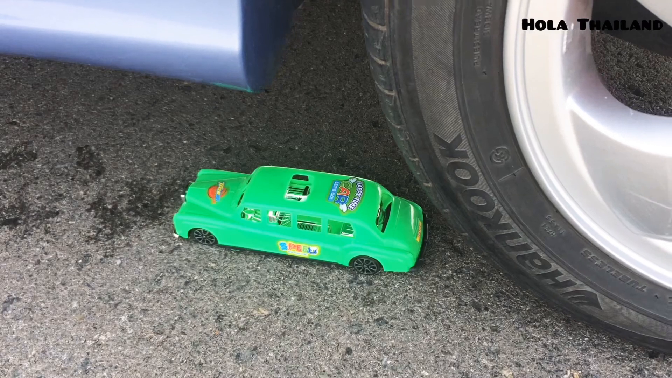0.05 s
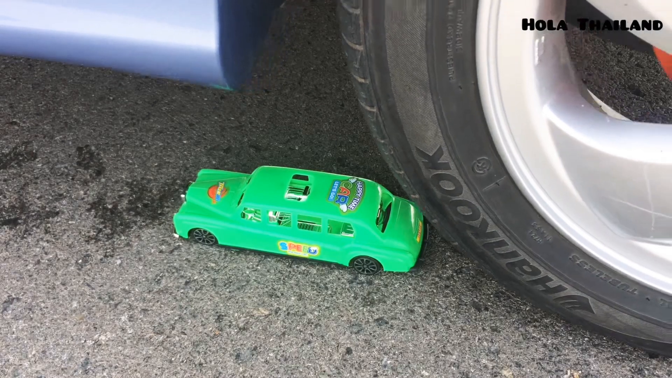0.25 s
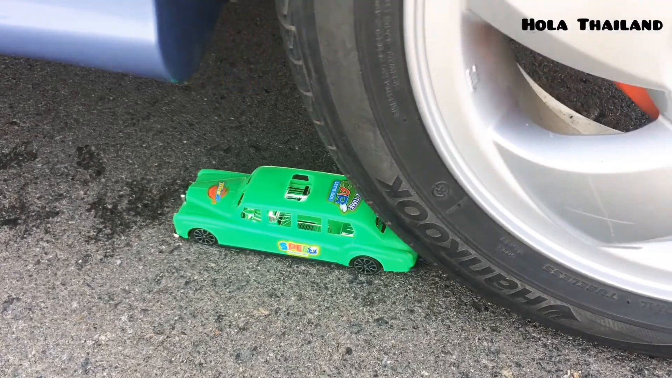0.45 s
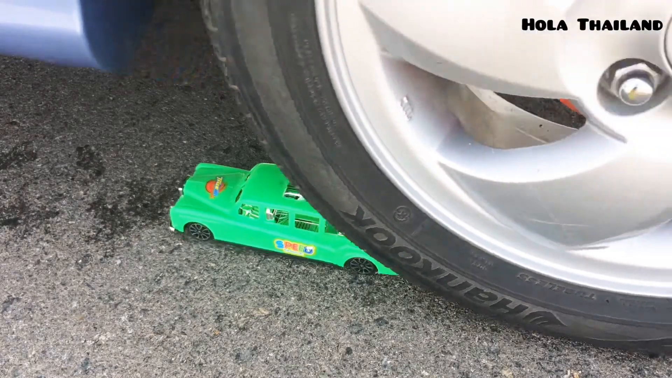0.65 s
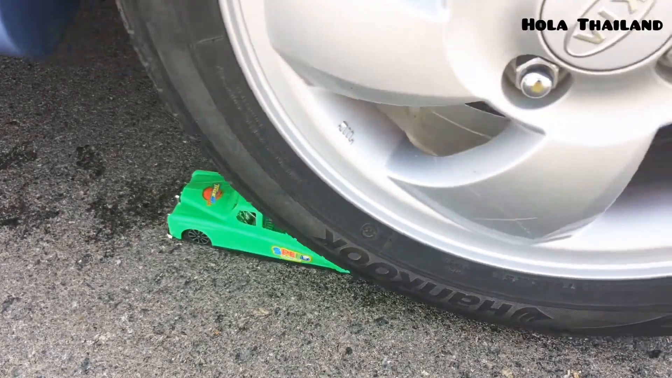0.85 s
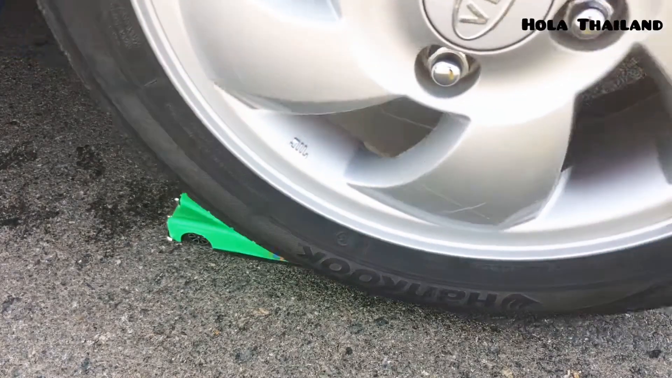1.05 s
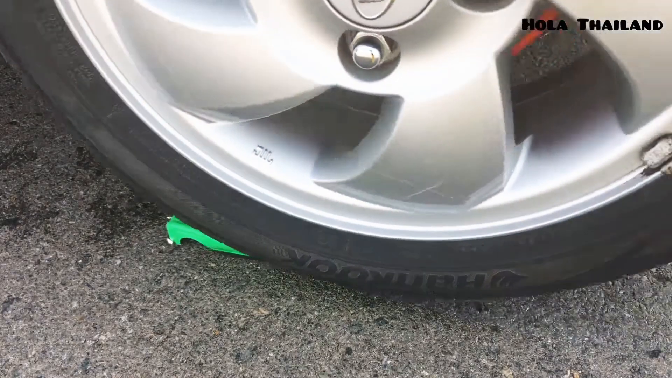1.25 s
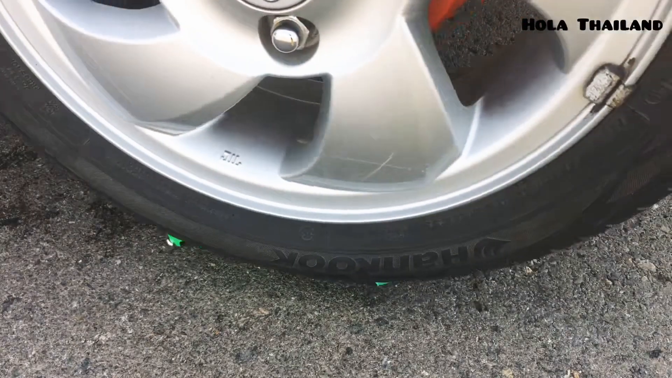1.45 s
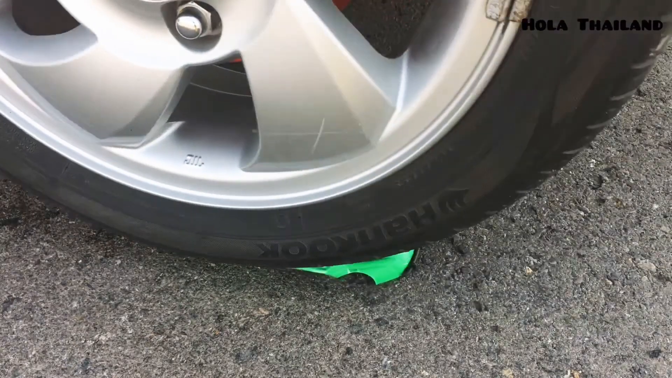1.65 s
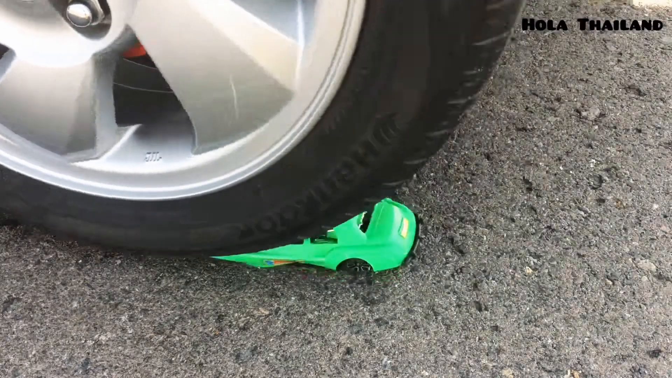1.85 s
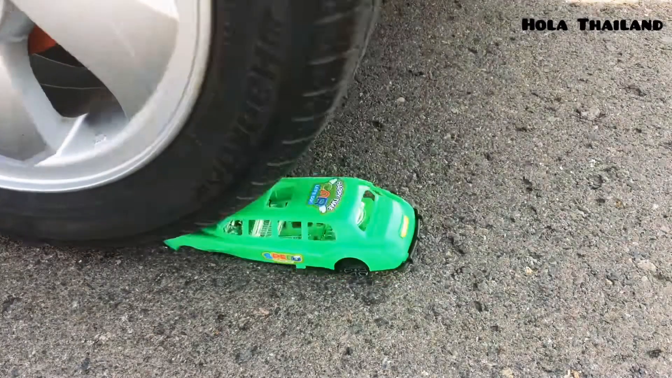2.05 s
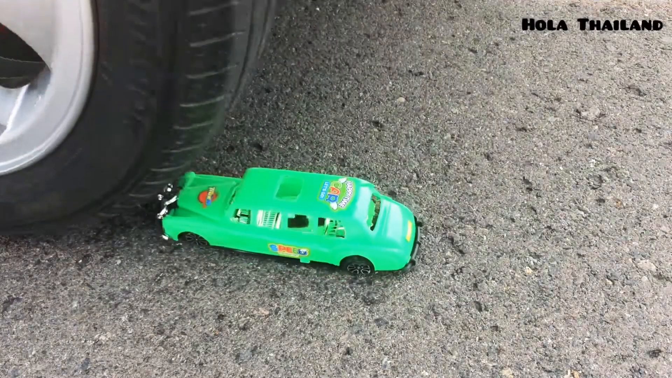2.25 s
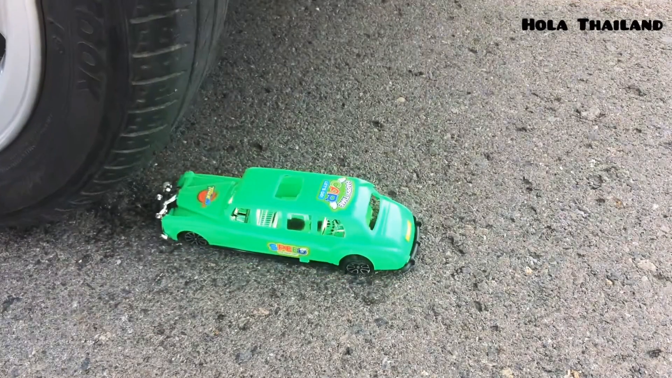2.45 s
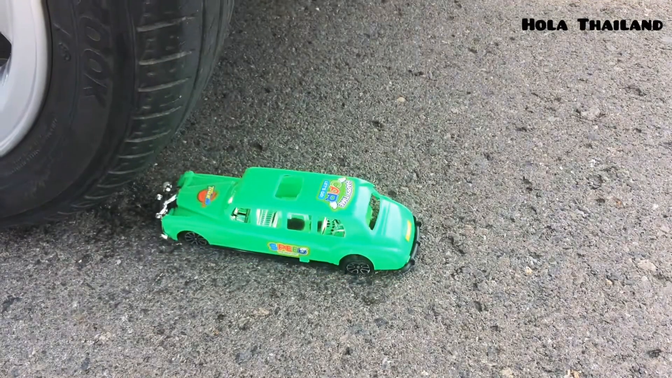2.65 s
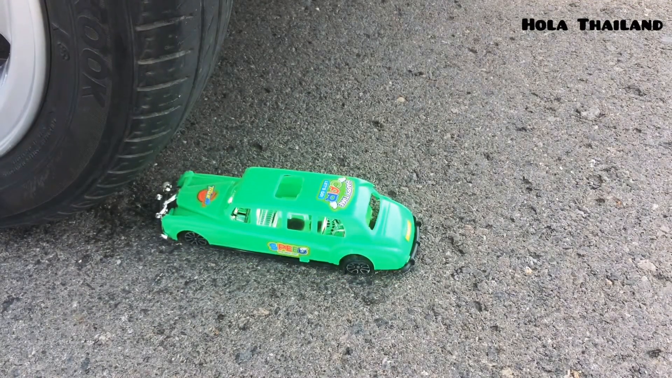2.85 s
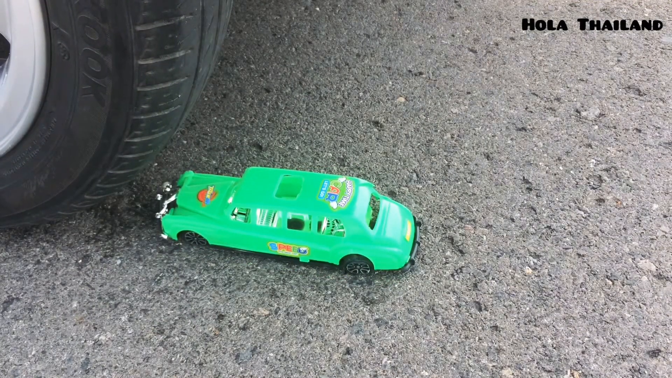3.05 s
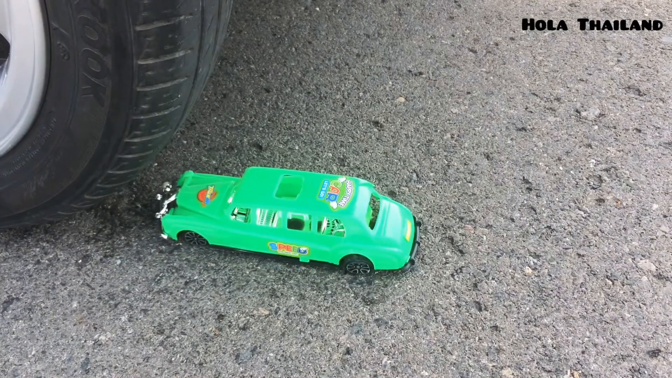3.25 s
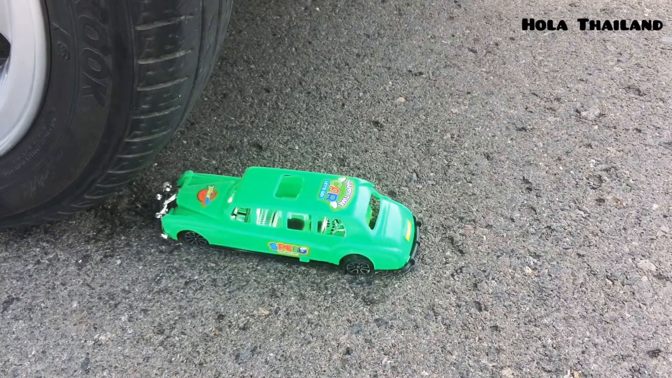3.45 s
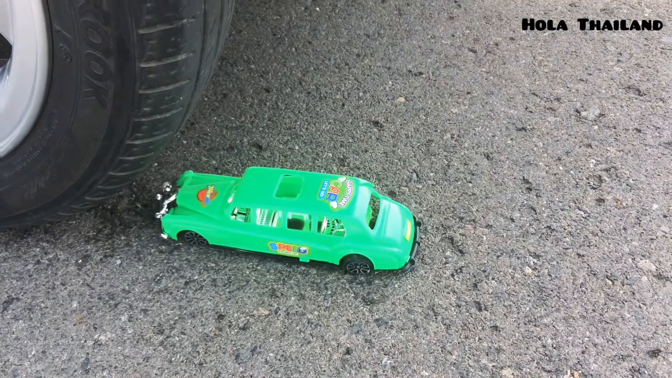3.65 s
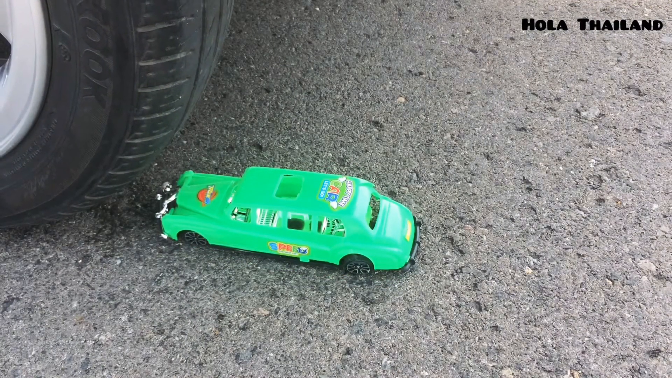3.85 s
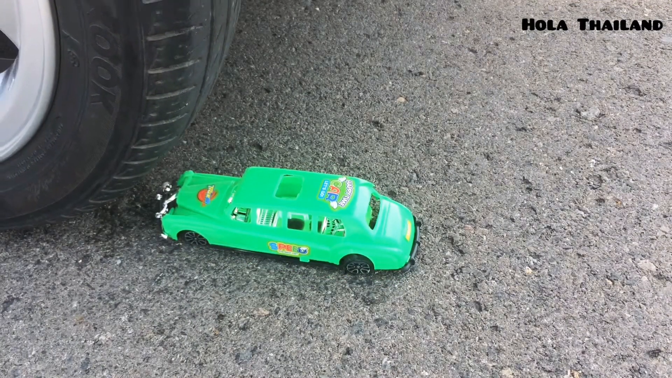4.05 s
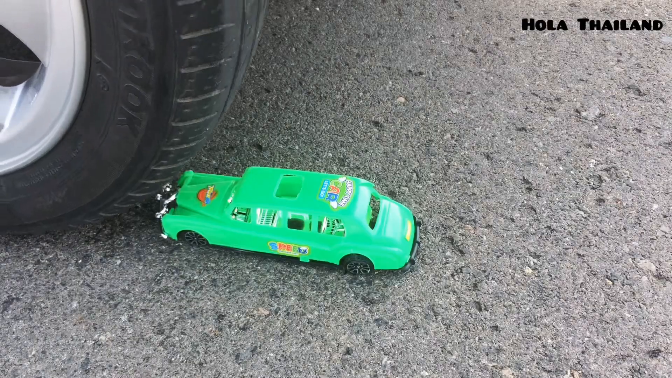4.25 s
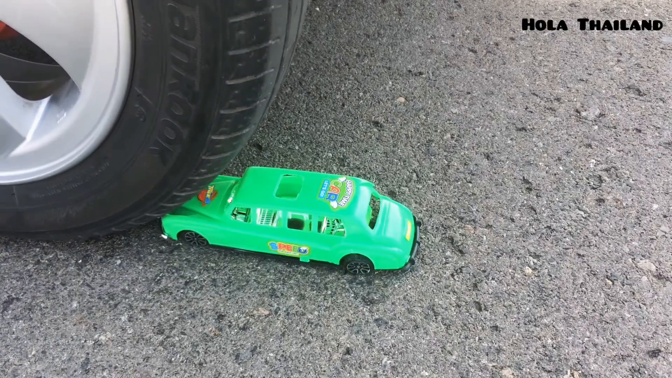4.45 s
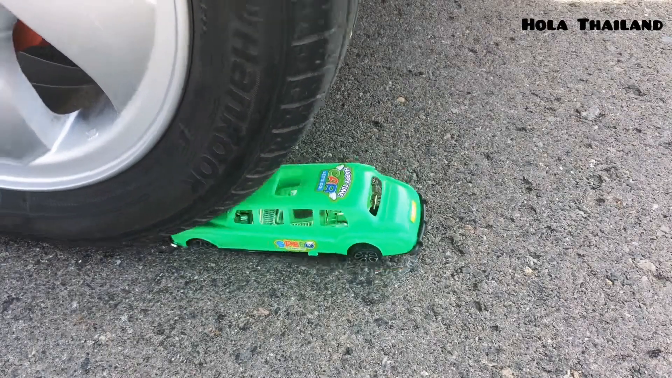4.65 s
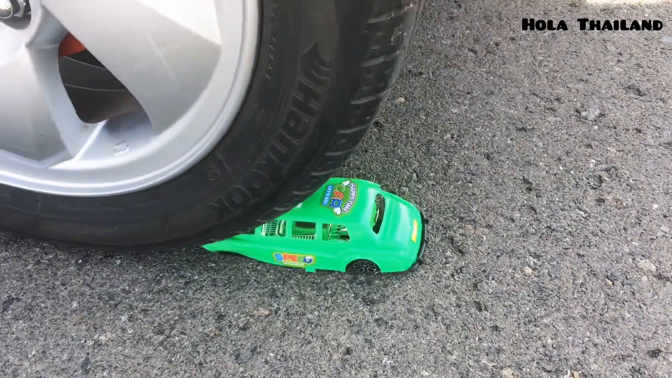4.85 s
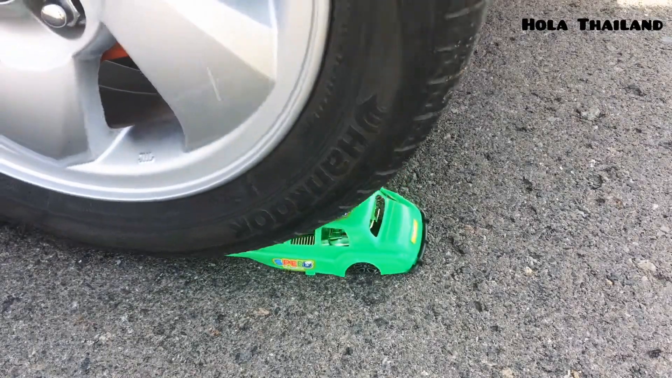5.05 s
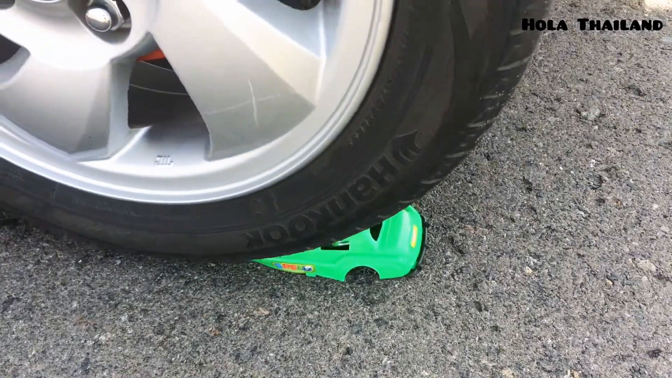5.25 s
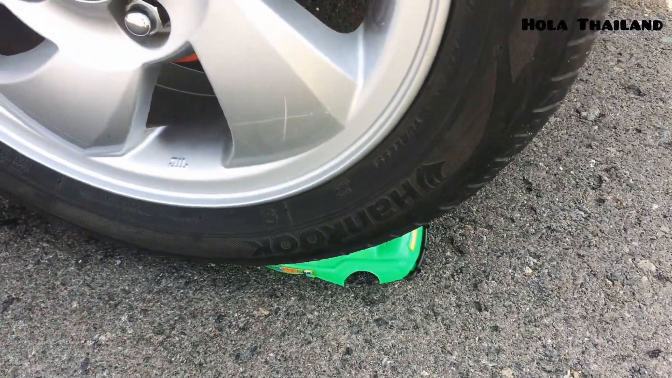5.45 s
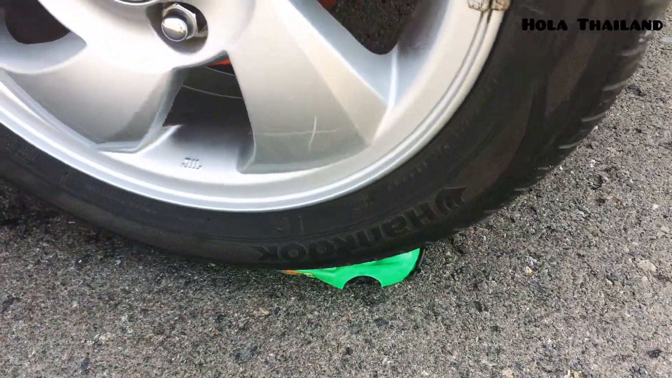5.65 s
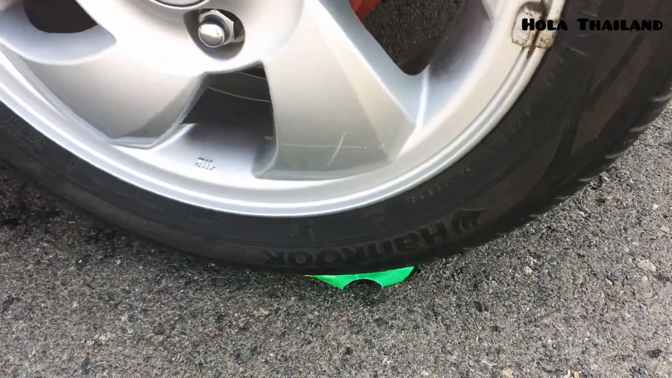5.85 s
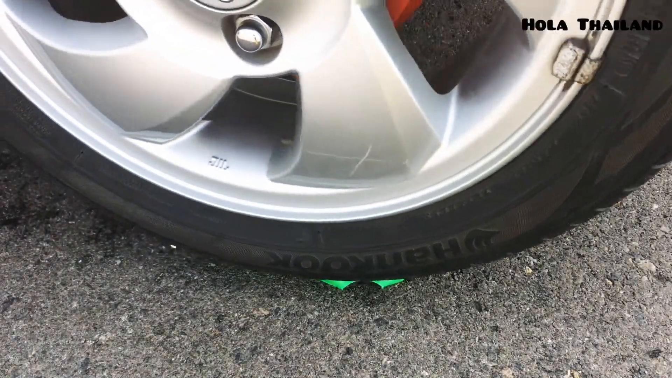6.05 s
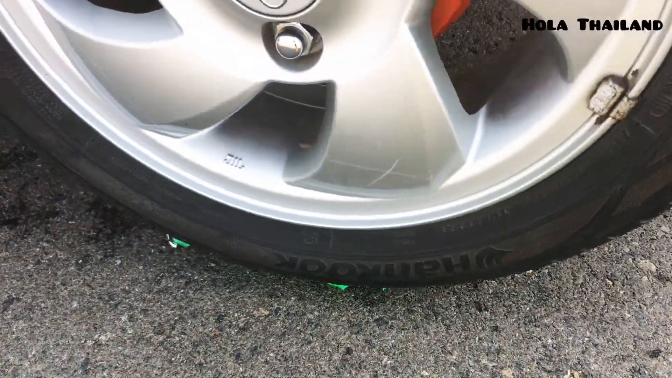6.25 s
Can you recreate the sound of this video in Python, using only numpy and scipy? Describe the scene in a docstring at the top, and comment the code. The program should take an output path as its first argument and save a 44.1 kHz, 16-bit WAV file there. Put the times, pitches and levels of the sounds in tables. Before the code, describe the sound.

Outdoors on asphalt, heard very close and dry. From 0 s a car engine pulls gently with a soft throbbing low roar and faint whine, while the tyre hisses and ticks over grit. Around 0.8-0.95 s rubber squeaks sharply upward on hollow plastic, breaking into rasps. Immediately bright, brittle cracks erupt, densest and loudest from 0.92 to 1.8 s, with short panel rings, rattling clatter and dull low thuds, thinning by 2.3 s. Wind-like low buffeting swells in lumps, strongest near 2.4-2.7 s, then stops dead at 2.75 s. Quiet idling remains, with soft scuffs at 3.2-3.6 s and a light engine push near 3.9 s. From 4.6 s the wheel creeps back: sparse, duller cracks, a strong one at 4.96 s, a thin creak at 5.23 s, a hollow thudding crunch at 5.85 s and a final heavy crack near 6.29 s.

```python
"""On asphalt, close to a phone: a car tyre rolls slowly over a hollow plastic toy car, stops and rolls back over it.
Rubber squeaks by stick-slip tones; panels crack as shaped noise bursts that ring and rattle; low modes thud.
The engine idles as throbbing filtered noise with a faint whine, and the tread hisses and ticks over grit.
Low filtered noise, like wind on the microphone, swells and stops dead; later come soft scuffs and thin creaks."""
import sys
import numpy as np
from scipy import signal
from scipy.fft import rfft, irfft
from scipy.io import wavfile
from scipy.ndimage import uniform_filter1d

SR = 44100
rng = np.random.default_rng(int(sys.argv[2]) if len(sys.argv) > 2 else 0)


def store_pcm(level_fs):
    """Save levels as 16-bit WAV."""
    pcm = np.round(np.clip(level_fs, -1, 1) * 32767).astype(np.int16)
    wavfile.write(sys.argv[1], SR, np.atleast_2d(pcm).T)


N = 277830
TIME = np.arange(N) / SR
CLATTER_T60_S = 0.063  # the hollow shell's decay by 60 dB, shared by the cracks and the squeak


def undb(db):
    """Decibels to gain."""
    return 10 ** (np.asarray(db) / 20)


def unit(x):
    """Scale to rms 1."""
    return x / np.sqrt(np.mean(x ** 2))


def decay(t, t60_s):
    """Exponential decay that falls by 60 dB in t60_s."""
    return np.exp(-np.log(1000) * t / t60_s)


def curves(table):
    """The columns of a table, joined by straight lines in time."""
    s, *columns = np.transpose(table)
    return [np.interp(TIME, s, column) for column in columns]


def slope(f, points):
    """Gain at frequencies f of a spectrum of (Hz, dB) points, joined on a logarithmic pitch axis."""
    hz, db = np.transpose(points)
    return undb(np.interp(np.log(f), np.log(hz), db))


def resonance(f, hz, width):
    """Response of one resonance, 1 at its centre."""
    return 1 / (1 + 1j * (f * f - hz * hz) / (f * width))


def bins(size):
    """Frequencies of a transform, kept just above zero."""
    return np.maximum(np.arange(size // 2 + 1) * SR / size, 1)


def colour(x, points):
    """Filter by a spectrum; rms 1."""
    return unit(irfft(rfft(x) * slope(bins(len(x)), points), len(x)))


def ring(x, hz, width):
    """Filter by one resonance; rms 1."""
    return unit(irfft(rfft(x) * resonance(bins(len(x)), hz, width), len(x)))


def causal(gain):
    """The response with this gain that starts at once and then dies away (minimum phase)."""
    cepstrum = irfft(np.log(gain))
    half = len(cepstrum) // 2
    return np.exp(rfft(np.r_[cepstrum[0], 2 * cepstrum[1:half], np.zeros(half)]))


def noise():
    """White noise."""
    return rng.standard_normal(N)


def walk(rate):
    """Slow chance: random levels held 1 / rate s and slewed; spread 1."""
    hold = int(SR / rate)
    levels = rng.standard_normal(N // hold + 1)
    return unit(uniform_filter1d(np.repeat(levels, hold)[:N], hold))


def grains(rate, spread_db):
    """Random clicks, most of them small, none far above the rest."""
    size_db = spread_db * np.minimum(rng.exponential(size=N), 3)
    return (rng.random(N) < rate / SR) * undb(size_db) * np.sign(noise())


def spell(start, end, attack_s, release_s):
    """Envelope that rises to 1 at start, holds until end and dies away."""
    before, after = np.minimum(TIME - start, 0), np.maximum(TIME - end, 0)
    return np.exp(-(before / attack_s) ** 2 - (after / release_s) ** 2)


def add(out, s, sound):
    """Mix a sound in at time s."""
    i = int(s * SR)
    out[..., i:i + sound.shape[-1]] += sound[..., :N - i]


def slip(hz, rough, partials_db, jitter=0.016, smear=0.58):
    """One rubbing contact: a wavering tone; uneven slips spread every partial into a narrow band."""
    phase = 2 * np.pi * np.cumsum(hz * (1 + jitter * (0.66 + 2 * rough) * walk(500))) / SR
    tone = 0
    for k, db in enumerate(partials_db, start=1):
        clean = (1 - rough) * np.sin(k * phase)
        smeared = smear * rough * walk(600) * np.cos(k * phase)
        tone = tone + undb(db) * (clean + smeared)
    return tone


def engine(whine_hz=1274.5, whine_width_hz=79.0, whine_db=-13.0, firing_hz=25.33, throb=0.19,
           bass_db=-10.0, roar_share=0.13, idle_db=-46):
    """Idle: a soft roar that throbs with the firings, a bass that grows with effort, and a narrow belt whine."""
    # spectrum of the roar: pitch_hz, level_db
    idle_colour = [(15, -41), (25, -10.5), (68, -7), (195, -11.5), (236, -9), (335, -17.5), (451, -10),
                   (516, -20), (560, -15), (607, -17.5), (988, -20), (1290, -20), (1790, -31),
                   (2220, -29.5), (16000, -54.5)]
    # the engine pulls to move the car: start_s, end_s, effort_db (in full on the bass, a share on everything)
    effort = [(0, .85, 15.5), (3.8, 4.021, 8)]
    effort_db = sum(db * spell(start, end, 0.17, 0.096) for start, end, db in effort)
    firing_rate = firing_hz * (1 + 0.025 * walk(2.6))
    firing = 1 + throb * np.sin(2 * np.pi * np.cumsum(firing_rate) / SR)
    roar = colour(noise(), idle_colour) * undb(1.1 * walk(5.6) - 4.0)
    bass = ring(ring(noise(), 76.0, 56.0), 62., 60.) * undb(bass_db + effort_db)
    whine = ring(ring(noise(), whine_hz, whine_width_hz), whine_hz, whine_width_hz)
    whine *= undb(whine_db + 2.1 * walk(10))
    return undb(idle_db + roar_share * effort_db) * (firing * (roar + whine) + bass)


def rumble(bed_db=-47.5, low_db=2.0, gust_db=-17.0, gust_growth=0.41, lump_db=5.5, end_s=2.752):
    """Low buffeting that comes in lumps, reaches higher as it grows, then stops dead."""
    # swells on top of the steady bed: start_s, end_s, level_db
    swells = [(0, 0.503, -45), (0.545, 0.968, -39), (1.17, 1.427, -34), (1.765, 1.944, -35.5),
              (2.114, 2.303, -31.5), (2.351, 2.42, -23.5), (2.477, 2.624, -27), (2.667, 2.75, -23)]
    # spectrum of the low flow: pitch_hz, level_db
    low_colour = [(25, -25), (45, -10.5), (65, 2), (110, 5.5), (175, 5.5), (230, -2.5), (300, -11.5),
                  (450, -50.5), (4000, -100)]
    # spectrum of the higher gusts: pitch_hz, level_db
    gust_colour = [(180, -20.5), (270, 0), (420, -5.5), (560, -13.5), (750, -33), (1100, -52), (4000, -100)]
    swell_power = sum((undb(db) * spell(start, end, 0.018, 0.038)) ** 2 for start, end, db in swells)
    strength = np.sqrt(undb(bed_db) ** 2 + swell_power)
    growth = (strength / undb(bed_db)) ** gust_growth
    upper = growth * undb(gust_db + lump_db * np.tanh(walk(45)))
    low, gust = colour(noise(), low_colour), colour(noise(), gust_colour)
    low /= np.sqrt(uniform_filter1d(low ** 2, size=4000))  # the flow is steady over a few eddies
    stop = np.clip((end_s - TIME) / 0.018 + 0.32, 0, 1)
    return stop * strength * (undb(low_db) * low + upper * gust)


def tread(flutter_db=1.5):
    """A fine hiss of rubber on asphalt while the wheel turns, with single grains ticking in it."""
    # the wheel rolls forward, slows to a halt, then creeps back: start_s, end_s, level_db
    rolls = [(0, 2.35, -53.5), (2.48, 2.74, -58), (4.6, 7.5, -68)]
    # the tread drags briefly over grit: centre_s, level_db, length_s (rise and fall each)
    drags = [(0.972, -53, 0.47), (2.351, -47.5, 0.051), (5.557, -54, .035), (6.188, -59, 0.11)]
    # spectrum of the hiss: pitch_hz, level_db
    grit_colour = [(300, -14.5), (900, 2.5), (2000, 1), (5000, 0), (8000, -10.5), (15000, -16)]
    rolling = sum(undb(db) * spell(start, end, .12, 0.021) for start, end, db in rolls)
    dragging = sum(undb(db) * spell(s, s, length, length) for s, db, length in drags)
    tick = rng.standard_normal(400) * np.exp(-np.arange(400) / 80)
    ticks = .6 * unit(signal.fftconvolve(grains(120, 2.5), tick)[:N])
    level = np.hypot(rolling, dragging) * undb(flutter_db * walk(8.7))
    return level * colour(noise() + ticks, grit_colour)


def small_cracks(count=24, spread_db=1.0, panel_hz=1900., spread_octaves=.6):
    """Rows like those of the fractures for the ticks of the strained shell, spread loosely over each pass."""
    # the shell ticks at random while the wheel is on it: start_s, end_s, level_db (before the spread)
    strain = [(.64, 2.3, -12.5), (4.565, 6.274, -18.5)]
    rows = []
    for start, end, db in strain:
        for k in range(count):
            when, cave = rng.random(2)
            loud, high = np.clip(rng.standard_normal(2), -2, 2)
            s = start + (end - start) * (k + when) / count
            rows.append((s, db + spread_db * loud, panel_hz * 2 ** (spread_octaves * high), cave))
    return rows


def splinter(f, count=14):
    """Every break leaves a piece of another shape, with a few sharp modes of its own; mean power 1."""
    pitches = 500 * 26 ** rng.random(count)  # 500 to 13000 Hz
    gain = np.abs(1 + sum(1.3 * resonance(f, hz, 80 + hz / 35) for hz in pitches))
    return gain / np.sqrt(np.mean(gain[(f > 500) & (f < 13000)] ** 2))


def cracks(tear_s=0.00059, panel_q=4., panel_db=11.0, panel_clatter_db=7.0, shell_db=-10.5,
           treble_t60_s=0.061, strain_dull_db=-11.5, size=8192):
    """Each fracture tears for about a millisecond, rings its panel and clatters on in shell and under wheel."""
    # fractures: start_s, level_db, panel_hz, cave_in (0 a clean snap, 1 the panel collapses)
    fractures = [(0.8167, 4.5, 1520, 0.4), (0.887, 5.5, 2790, 0.48), (0.9197, 10, 2060, 0.63),
                 (0.9223, 16, 4060, 0.27), (1.012, 11.5, 1930, 0.61), (1.0605, 13.5, 3100, 0.63),
                 (1.0911, 10, 5200, 0.62), (1.1058, 10, 5040, 0.29), (1.185, 1.5, 5250, 0.48),
                 (1.1976, 12.5, 710, 0.52), (1.2806, 7, 1590, 0.11), (1.341, -2.5, 1476, 0.36),
                 (1.3958, 3.5, 5100, .35), (1.4099, 14.5, 2530, 0.55), (1.4199, 14, 1190, 0.55),
                 (1.5097, 6.5, 2360, 0.89), (1.5278, 10.5, 2730, 0.54), (1.551, 4.5, 2780, 0.27),
                 (1.5635, 12.5, 5800, 0.44), (1.5896, 4, 3630, .3), (1.6026, 7.5, 2320, 0.054),
                 (1.6469, 13, 464, 0.3), (1.6834, 7, 1260, 0.82), (1.6979, 7, 2330, 0.76),
                 (1.7025, 5, 3700, 0.83), (1.7262, 4.5, 483, 0.47), (1.7358, 16.5, 634, 0.38),
                 (1.755, 10, 3460, 0.1), (1.7886, 10.5, 1010, 0.98), (1.8131, 13, 685, 0.23),
                 (1.903, 6.5, 2780, 0.2), (1.9653, -2.5, 1590, 0.2), (2.0122, -9, 2770, 0.21),
                 (2.0335, -3.5, 740, 0.14), (2.0614, 5, 810, 0.42), (2.1142, 3, 1250, 0.082),
                 (2.1487, -5.5, 1290, 0.38), (2.192, -8.5, 1650, 0.35), (2.207, 8.5, 2190, 0.22),
                 (2.2272, -1, 1540, 0.15), (2.2986, -13.5, 5700, 1), (2.3062, -12, 8350, .8),
                 (4.629, 0, 2200, 0.15), (4.6415, -7.5, 1440, 0.67), (4.67, -4, 4200, 0.33),
                 (4.881, -1.5, 1110, 0.25), (4.964, 16.5, 1470, 0.26), (5.007, -12, 1310, 0.26),
                 (5.2178, 2.5, 1650, 0.65), (5.2302, 6, 3500, 0.3), (5.3003, -20.5, 820, .8),
                 (5.4712, -0.5, 1070, 0.6), (5.5166, -2.5, 5500, .4), (5.5875, -2, 1330, 0.47),
                 (5.593, -3.5, 1350, 0.47), (5.779, -12, 1060, .25), (5.846, 10.5, 1640, 0.85),
                 (6.029, -5, 2120, 0.68), (6.159, -7, 1120, 0.57), (6.286, 15.5, 1120, 0.53)]
    # resonances of the toy's shell: pitch_hz, width_hz, level_db (before shell_db)
    shell_modes = [(507, 52, -8.5), (1151, 22, -2.5), (1430, 420, 1.5), (2270, 43, -6), (2750, 75, -10),
                   (2700, 68, 0.5), (3456, 120, -3.5), (4800, 300, -3), (5930, 760, 8.5)]
    # treble of the cracks, the whole shell bright and the broken one dull: time_s, gain_db at 8 kHz
    snap_points = [(.9, -11), (1.15, -8.5), (1.5, -13.5), (2.3, -9.0), (4.7, -23), (4.96, -22),
                   (5.25, -30.5), (5.85, -20.5), (6.3, -22)]
    out, t, f = np.zeros((2, N)), np.arange(size) / SR, bins(size)
    modes = sum(undb(db) * resonance(f, hz, width) for hz, width, db in shell_modes)
    shell = np.abs(1 + undb(shell_db) * modes)
    shell /= np.sqrt(np.mean(shell[(f > 500) & (f < 7000)] ** 2))
    treble = 1 / (1 + (4000 / f) ** 4)  # share of the power
    fade = np.clip(3 - 4 * t / t[-1], 0, 1)
    build = 1 - np.exp(-t / 0.00043)

    def burst(envelope):
        """Spectrum of a dense run of tiny impacts, energy 1."""
        return rfft(unit(rng.standard_normal(size) * envelope)) / np.sqrt(size)

    def panel(hz, peak_db):
        """The ring of the broken panel."""
        return causal(np.hypot(1, undb(peak_db) * np.abs(resonance(f, hz, hz / panel_q))))

    breaks = [(row, 0) for row in fractures] + [(row, strain_dull_db) for row in small_cracks()]
    for (s, db, hz, cave), dull_db in breaks:
        # a deeper cave-in sounds hollower and clatters more
        body_db, clatter_db = -15.5 + 20.5 * cave, -8 + 16 * cave
        snap_db = np.interp(s, *np.transpose(snap_points)) + dull_db

        tear = burst(t * np.exp(-t / tear_s))  # the crack gathers speed, then runs out
        # one sudden break is nearly even apart from the panel's ring
        tear *= panel(hz, panel_db) / np.sqrt(np.abs(tear))

        low = burst(build * decay(t, CLATTER_T60_S))
        high = burst(build * decay(t, treble_t60_s))
        rattle = np.sqrt(1 - treble) * low + np.sqrt(treble) * high
        pieces = causal(shell * splinter(f)) * panel(hz, panel_clatter_db)
        clatter = undb(clatter_db) * pieces * rattle

        # a dull crack keeps falling towards the very top
        gain = slope(f, [(40, body_db - 39.0), (100, body_db - 10.5), (500, body_db + 0.5),
                         (1200, -3.5), (4000, -4.5), (8000, snap_db), (16000, 1.35 * snap_db + 5.0)])
        # a short treble noise of opposite sign in left and right
        side = undb(clatter_db - 11) * treble ** 2 * burst(build * np.exp(-t / .006))
        spectrum = causal(gain) * (tear + clatter + np.array([side, -side]))
        add(out, s, undb(db) * fade * irfft(spectrum))
    return out


def squeak(second_ratio=1.2, second_db=-5.5, rasp_db=-4.5, ring_db=-7.0):
    """Rubber sticks and slips on the shell at two places: gliding tones that break up into rasping clicks."""
    # rubber slipping on plastic: time_s, slip_rate_hz, level_db, roughness (0-1)
    slips = [(.765, 1404, -33, .95), (0.809, 1640, -29.5, 0.69), (.83, 1810, -19.5, 0.25),
             (.865, 1900, -23.5, 0.66), (.884, 2350, -14, .35), (.898, 2980, -20, 0.17),
             (.906, 2480, -16.5, 0.32), (0.946, 2870, -23, 0.84)]
    hz, db, rough = curves(slips)
    first = slip(hz, rough, [1.5, -4.5, -12.0, -14], jitter=0.034)
    second = rough * slip(hz * second_ratio, 0.64, [-3, 2, -2])
    rasp = colour(grains(2500, 1.8), [(150, -21.5), (600, -11.5), (1400, 4.5), (2600, -0.5),
                                      (4500, -1.0), (6800, -4), (8500, -7), (15000, -10.5)])
    rasp *= undb(rasp_db + 0.48 * (db + 28.0)) * rough  # harder pressure rasps more
    rub = first + undb(second_db) * second + rasp
    rub *= undb(db + 2 * walk(220)) * spell(slips[0][0], slips[-1][0], .004, .009)
    # the hollow shell rings on briefly
    tail = noise() * decay(TIME, CLATTER_T60_S)
    return rub + undb(ring_db) * signal.fftconvolve(rub, tail / np.linalg.norm(tail))[:N]


def thuds(push_s=.0007, stiffen=0.14, settle_s=0.0096):
    """Slower blows that each ring one low mode; it starts sharp, while the bend is deep, and settles."""
    # dull knocks as the shell caves in or the car settles: start_s, level_db, settled_hz, t60_s
    knocks = [(0.85, -15.5, 190.8, 0.031), (0.925, -23.5, 297, 0.18), (1.198, -37.5, 790, 0.39),
              (1.283, -23, 110, 0.21), (1.408, -10.5, 59, 0.069), (1.696, -6.5, 69, 0.026),
              (1.791, -30, 279.1, 0.7), (1.99, -13.5, 114, 0.033), (3.294, -41, 150.4, 0.085),
              (4.9653, -22.5, 277, 0.036), (5.2205, -23, 648, 0.057), (5.8531, -16, 311, 0.091),
              (5.853, -25, 527, 0.095), (5.856, -22, 271.5, 0.23), (5.859, -25.5, 161, 0.14)]
    out, t = np.zeros(N), np.arange(SR // 2) / SR
    for s, db, hz, t60 in knocks:
        pitch = hz * (1 + stiffen * np.exp(-t / settle_s))
        phase = 2 * np.pi * np.cumsum(pitch) / SR
        envelope = decay(t, t60) * (1 - np.exp(-t / push_s))
        add(out, s, -undb(db) * np.sin(phase) * envelope)
    return out


def scuffs(body_db=8.5, scrape_db=-18.0):
    """Short dull scrapes on the asphalt: dense random clicks, filtered around one pitch."""
    # soft scuffs: centre_s, level_db, length_s, centre_hz
    scrapes = [(3.246, -35, 0.017, 420), (3.301, -35, 0.034, 320), (3.468, -44, 0.017, 850),
               (3.547, -46, 0.075, 450)]
    out = np.zeros(N)
    for s, db, length, hz in scrapes:
        scrape = colour(grains(3300, 1.5), [(40, -20), (hz / 2.6, body_db), (hz * 2.04, -2),
                                            (hz * 4, scrape_db), (12000, -45), (20000, -70)])
        out += undb(db) * np.exp(-2 * ((TIME - s) / length) ** 2) * scrape
    return out


def creaks(rough=.85, jitter=0.032, rise_octaves_per_s=2.0):
    """Broken edges slide over each other with a thin, rough, slightly rising chirp."""
    # brief creaks of plastic on plastic: centre_s, slip_rate_hz, level_db, length_s (rise and fall each)
    chirps = [(5.231, 3350, -17.5, .003), (5.242, 3680, -23.5, 0.0065)]
    out = np.zeros(N)
    for s, hz, db, length in chirps:
        glide = 2 ** (rise_octaves_per_s * np.clip(TIME - s, -2 * length, 2 * length))
        out += undb(db) * spell(s, s, length, length) * slip(hz * glide, rough, [0, -25], jitter)
    return out


def scene():
    """Everything lies straight ahead of the phone; a little treble noise differs between left and right."""
    return engine() + rumble() + tread() + cracks() + squeak() + thuds() + scuffs() + creaks()


def record(dry, ceiling=.72, top_hz=16000):
    """The phone rounds the sharpest peaks and cuts the top."""
    rounded = ceiling * np.tanh(dry / ceiling)
    return signal.sosfilt(signal.ellip(8, .2, 70, top_hz, fs=SR, output="sos"), rounded)


dry = scene()
out = record(dry)
store_pcm(out)
```